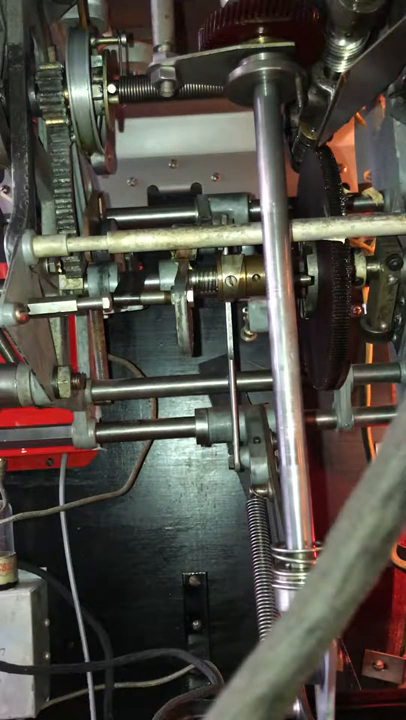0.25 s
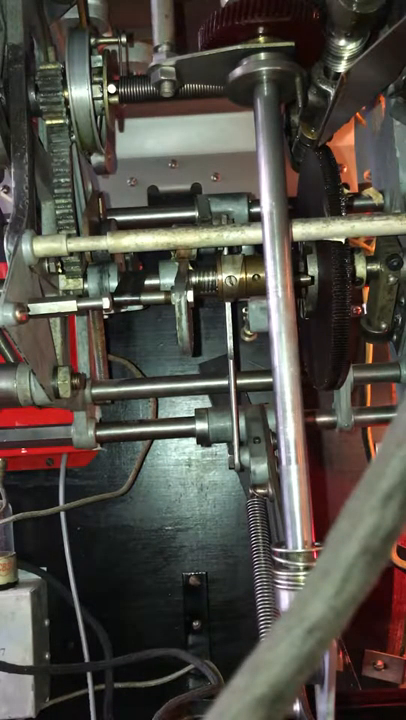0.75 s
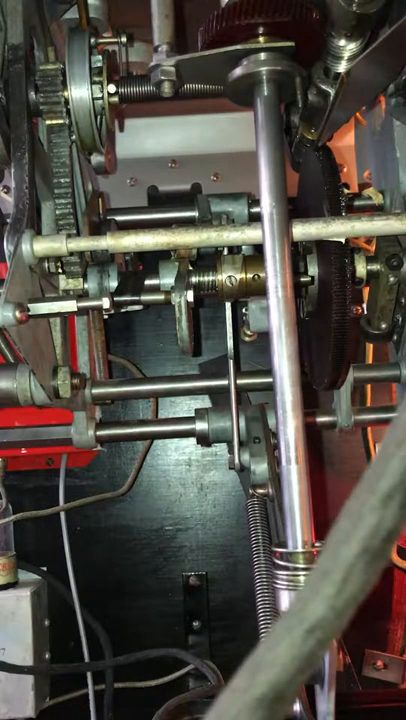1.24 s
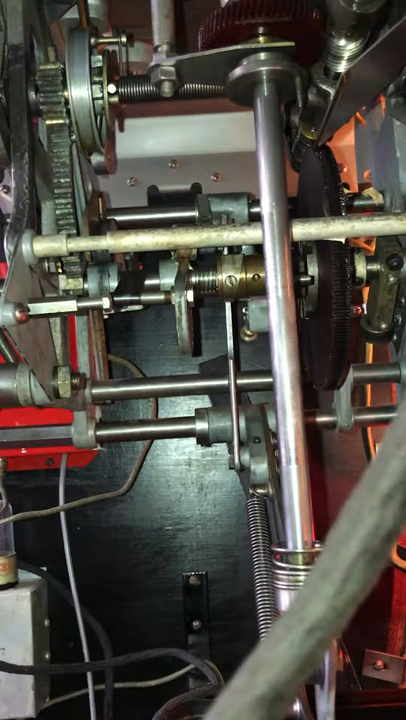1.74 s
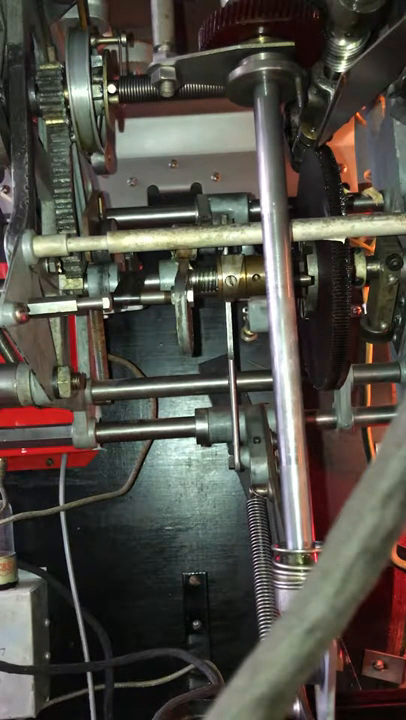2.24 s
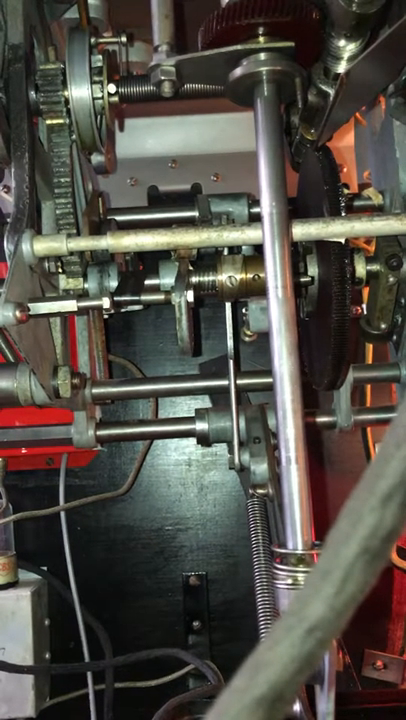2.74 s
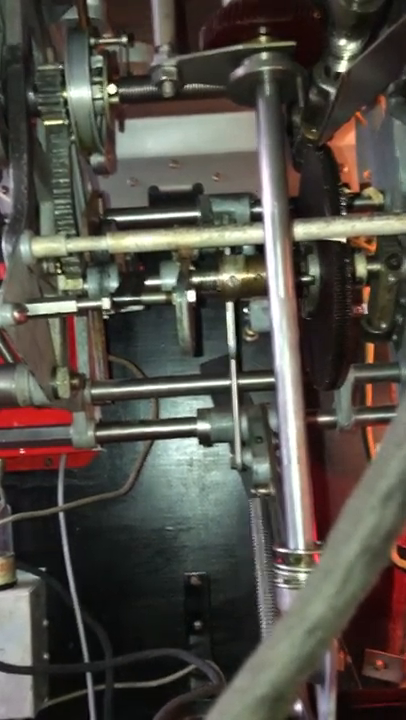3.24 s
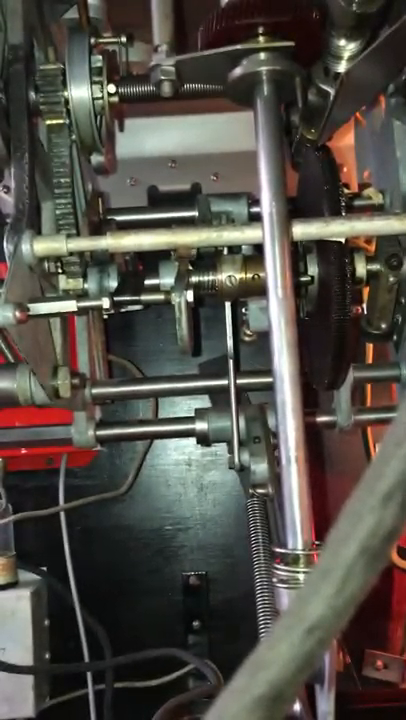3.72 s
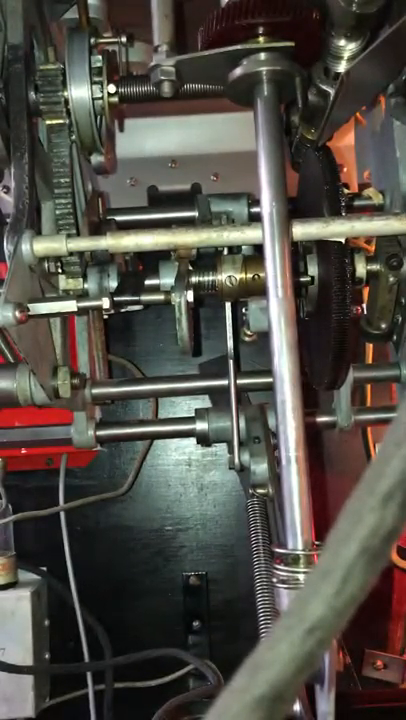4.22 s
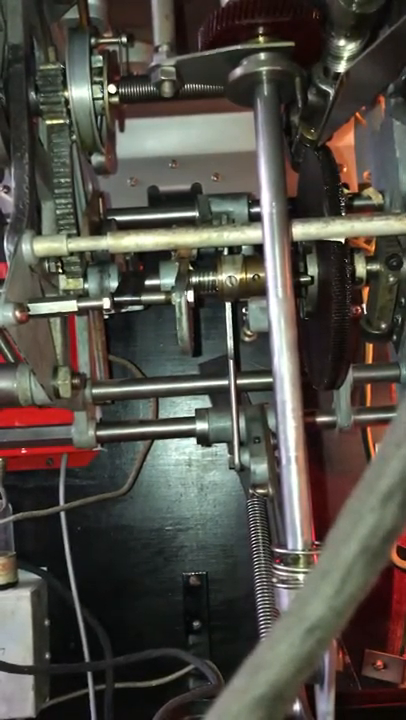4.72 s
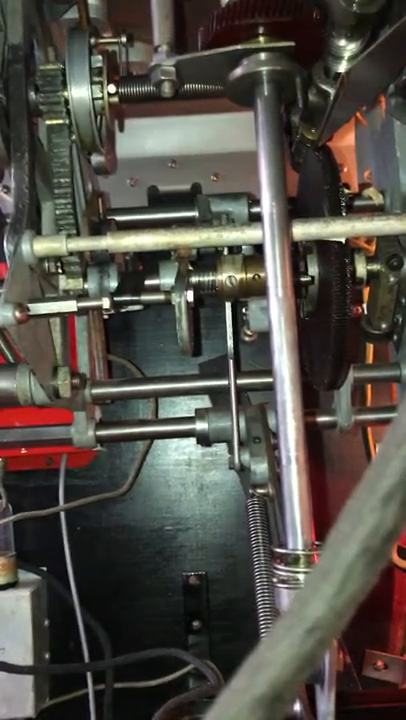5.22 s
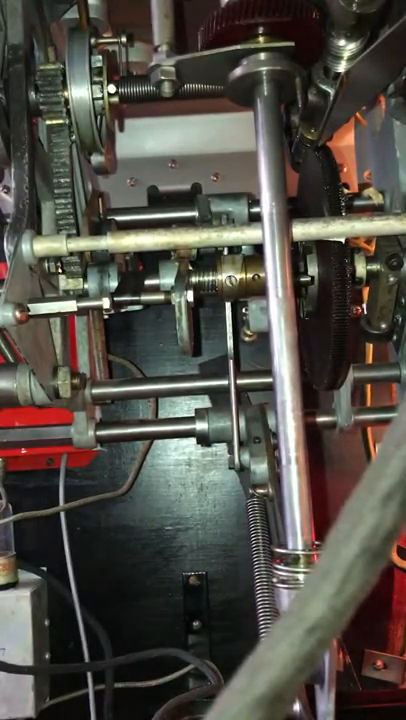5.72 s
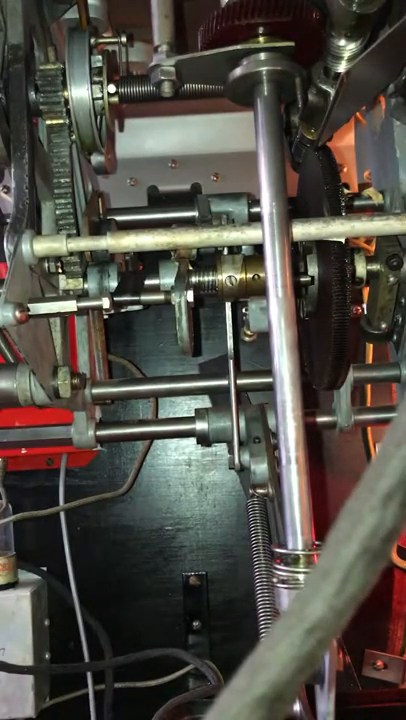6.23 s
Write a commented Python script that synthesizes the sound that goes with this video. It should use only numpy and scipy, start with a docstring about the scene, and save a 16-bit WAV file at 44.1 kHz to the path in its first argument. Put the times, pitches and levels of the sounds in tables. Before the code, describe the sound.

Close, dry indoor pickup of an open jukebox mechanism. A low 100 Hz hum, thin hiss and regular tiny electrical ticks run throughout. After a faint tap and light shaft rub, five quick heavy knocks clatter with steel levers, jingling springs and a buzzing plate. A pause follows, then five duller, boomy thumps with little clatter, settling back to hum.

```python
"""Mains hum over a faint hiss, then heavy knocks: the open works of a jukebox, miked close up in a room.
Two runs of five knocks land at two spots, the first run hard, the second dull.
Each knock rocks the cabinet, swings its panel, rings its modes and throws loose levers, which drop back.
Springs jingle with the shaking, a plate buzzes through the later knocks of the first run,
small parts tap now and then, and regular electrical ticks run through the hiss."""
import sys
import numpy as np
from scipy import signal
from scipy.fft import rfft, irfft, next_fast_len
from scipy.io import wavfile
from scipy.ndimage import uniform_filter1d

SR = 44100
rng = np.random.default_rng(int(sys.argv[2]) if len(sys.argv) > 2 else 0)


def generate_wav(signal):
    """Clip the signal to [-1, 1] and save it as 16-bit WAV at the path in sys.argv[1]."""
    frames = np.transpose(np.atleast_2d(signal))
    scaled = np.clip(frames, -1, 1) * 32767
    pcm = np.round(scaled).astype(np.int16)
    wavfile.write(sys.argv[1], SR, pcm)


N = 285184  # samples

# one run of knocks a spot, one row a knock: start_s, force_db, contact_corner_hz,
# closing_s (how long the contact takes to close), click_db, lever_drop_db
KNOCK_RUNS = [
    [(2.768, -8.5, 252, 0.0062, -53, -54), (2.948, -9, 504, .0003, -35, -58),
     (3.121, -3, 770, 0.00018, -39, -60), (3.3075, 0, 756, 0.00033, -39.5, -61),
     (3.488, -6, 754, 0.000057, -43, -70)],
    [(4.369, -6.5, 645, 0.0026, -52.5, -59), (4.538, -7.5, 613, 0.0035, -54.5, -64.5),
     (4.699, -3, 713, .003, -55, -57.5), (4.8745, -2.5, 785, 0.0019, -52.5, -60.5),
     (5.0445, 0.5, 1000, 0.0024, -54.5, -49)],
]
# how each spot answers a knock of 0 dB force: swing_hz, swing_length_s, swing_db,
# overtone_db (first knock of the run, whatever its force), rocking_db, ring_db, clatter_db, drop_centre_hz
KNOCKED_SPOTS = [(111.7, 0.021, -1, -12, -14.5, -1.72, -27, 970),
                 (110.1, 0.036, -9, -33, -18.5, 0, -45.5, 630)]
# dB gained for each dB of force: harder knocks clatter more, and ring and rock relatively less
RING_SLOPE, CLATTER_SLOPE = 0.59, 1.26


def amp(db):
    """Turns dB into a linear factor."""
    return 10 ** (np.asarray(db) / 20)


def evened(x):
    """Scales to rms 1."""
    return x / np.sqrt(np.mean(x ** 2) + 1e-20)


def read(points, hz):
    """Joins (Hz, value) points on a log-frequency axis."""
    f, value = np.transpose(points)
    return np.interp(np.log(hz + 1), np.log(f + 1), value)


def add(mix, s, sound):
    """Mixes a sound in at s seconds."""
    part = mix[round(s * SR):][:len(sound)]
    part += sound[:len(part)]


def noise(gain, size):
    """Noise of rms 1 with the spectrum gain(Hz)."""
    n = next_fast_len(size, True)
    spectrum = rfft(rng.standard_normal(n)) * gain(np.fft.rfftfreq(n, 1 / SR))
    return evened(irfft(spectrum, n)[:size])


def coloured(points, size):
    """Noise of rms 1 whose colour is given as (Hz, relative dB per Hz) points."""
    return noise(lambda f: amp(read(points, f)), size)


def band(hz, octaves):
    """A bell-shaped spectrum around hz."""
    return lambda f: np.exp(-.5 * (np.log2((f + 1) / hz) / octaves) ** 2)


def drift(rate_hz):
    """Slow random wandering of rms 1."""
    return noise(lambda f: np.exp(-(f / rate_hz) ** 2) * (f > 0), N)


def fall(t, t60):
    """A steady fall, 60 dB in t60 seconds."""
    return np.exp(-np.log(1000) * t / t60)


def dying(t, t60, rise):
    """A quick rise, then a steady fall in dB."""
    return (1 - np.exp(-t / rise)) * fall(t, t60)


def grainy(t, depth_db, size=60):
    """Metal meets metal in many tiny bounces: a random level, smoothed over size samples."""
    bounces = evened(uniform_filter1d(rng.standard_normal(len(t)), size))
    return evened(amp(depth_db * bounces))


def rattle(db, hz, octaves, t60):
    """A short burst of chatter in the range of one part."""
    t = np.arange(SR // 2) / SR
    grain = grainy(t, depth_db=0.84 * min(octaves, 1))
    return amp(db) * noise(band(hz, octaves), len(t)) * grain * dying(t, t60, rise=0.0022)


def room_noise(db=-61.0):
    """Low noise of the room, its treble rolled off further above 2600 Hz."""
    # colour of the room: frequency_hz, relative level_db per Hz
    room_colour = [(20, -37), (38, -7), (55, 3), (75, 1.5), (130, -3.5), (175, -9.5), (240, 3.5), (290, 1),
                   (340, -12), (450, -14.5), (800, -15), (1150, -18.5), (1450, -21), (2200, -23)]
    return amp(db) * noise(lambda f: amp(read(room_colour, f)) / (1 + (f / 2600) ** 4), N)


def amplifier_hiss(db=-73.5):
    """Thin, steady amplifier noise."""
    # colour of the hiss: frequency_hz, relative level_db per Hz
    hiss_colour = [(1500, -27), (2300, -3.5), (3900, -4), (4400, -3.5), (4850, -10), (5500, -0.5),
                   (6400, -1), (7600, -6), (8600, -3.5), (10400, -7.5), (10900, -5), (16000, -3.5)]
    return amp(db) * coloured(hiss_colour, N)


def shaft_rub(db=-82.5, swell_db=5, swell_at_s=2.17, swell_half_s=0.44):
    """A shaft rubs lightly throughout, and harder for a moment before the first run."""
    swell = np.exp(-((np.arange(N) / SR - swell_at_s) / swell_half_s) ** 4)
    return amp(db + swell_db * swell + 0.71 * drift(15)) * noise(band(3860, 0.31), N)


def hum(mains_hz=50, waver_db=0.5):
    """Transformer and motor hum at multiples of the mains, each wavering a little."""
    # hum lines: multiple of the mains, rms level_db
    hum_lines = [(2, -51), (3, -73.5), (4, -67), (6, -62), (7, -78), (8, -80.5), (10, -79), (14, -66.5),
                 (16, -80.5), (18, -82), (20, -77.5), (24, -82), (38, -90)]
    t, out = np.arange(N) / SR, np.zeros(N)
    for multiple, db in hum_lines:
        level = np.sqrt(2) * amp(db + waver_db * drift(5.6))
        out += level * np.sin(2 * np.pi * (multiple * mains_hz * t + rng.random()))
    return out


def interference(first_s=.091, gap_s=.1024, db=-52.0, spread_db=3.5):
    """Regular radio bursts leak into the microphone circuit as tiny, bright ticks."""
    out = np.zeros(N)
    at = np.round(np.arange(first_s, N / SR - .01, gap_s) * SR).astype(int)
    out[at] = amp(db + spread_db * rng.standard_normal(len(at)))
    return signal.lfilter([1, -1], [1], out)  # each tick goes up, then down


def small_parts():
    """Single loose parts tap and one squeaks in the works, as short bursts of banded noise."""
    # taps and the squeak: start_s, level_db, centre_hz, width_octaves, t60_s
    taps = [(1.605, -55, 1140, .3, .075), (1.62, -63, 860, .16, 0.21), (2.189, -60, 1200, .47, .06),
            (2.505, -65, 1600, 0.57, .063), (3.607, -65, 1600, .8, 0.084), (4.537, -43, 1120, 0.35, 0.054),
            (4.698, -47, 1030, 0.13, 0.099), (4.888, -61, 6300, .045, .09), (4.889, -60, 3050, 0.06, 0.075),
            (5.058, -54.5, 3000, .11, 0.058), (5.081, -47, 936, 0.39, 0.2), (5.303, -62, 1130, 0.13, .08),
            (5.715, -67, 950, 0.43, .1), (6.255, -65.5, 1665, 0.023, 0.2)]
    out = np.zeros(N)
    for s, db, hz, octaves, t60 in taps:
        add(out, s, rattle(db, hz, octaves, t60))
    return out


def buzz(shake, between=1.0, uneven_db=1.5):
    """A loose plate works itself into a buzz, louder on every forward swing of the cabinet, then settles."""
    # colour of the buzzing plate: frequency_hz, relative level_db per Hz
    buzz_colour = [(500, -3.5), (900, -5.5), (1150, 1.5), (1450, -16), (2100, -11), (2900, -23),
                   (3600, -16), (4800, -31), (9000, -39)]
    start_s, rise_s, end_s, release_t60_s = 3.13, 0.18, 3.645, 0.3
    between_db = -57  # level between forward swings
    t = np.arange(N) / SR
    slow = uniform_filter1d(shake, SR // 300)
    contact = uniform_filter1d((slow > 0) * 1., SR // 1000)
    attack = np.clip((t - start_s) / rise_s, 0, 1)
    release = fall(np.maximum(t - end_s, 0), release_t60_s)
    level = attack * release * amp(between_db + uneven_db * drift(35))
    return level * (between + contact) * coloured(buzz_colour, N)


def springs(shake, db=-76.0, hold_s=0.02, full_db=-39):
    """Springs jingle as long as the frame shakes, up to the limit of their play."""
    # resonances of the coil springs: frequency_hz, width_hz, level_db
    spring_modes = [(3650, 220, -3), (4420, 80, 2.5), (5570, 120, 1), (6230, 140, -4), (7070, 120, 2),
                    (8590, 120, -5), (10800, 600, -5.5), (14100, 130, -5), (15200, 130, -6)]

    def resonances(f):
        return sum(amp(level) / (1 + (2 * (f - hz) / width) ** 2) for hz, width, level in spring_modes)

    r = np.exp(-1 / (hold_s * SR))
    shaking = signal.lfilter([1 - r], [1, -r], abs(shake))
    drive = np.tanh(shaking / amp(full_db))
    return amp(db) * drive * noise(resonances, N) * amp(2 * drift(60))


def levers(t):
    """All lever modes struck at once, at a slightly different place each time; greased joints damp them."""
    # modes of the steel levers and shafts: frequency_hz, level_db
    lever_modes = [(823, -3.5), (899, -3), (945, -8), (1071, 4), (1115, -2.5), (1200, -7.5), (1261, -21),
                   (1303, 2), (1412, -12.5), (1458, -1.5), (1626, -6), (1814, 2.5), (2017, -26),
                   (2191, -20), (2390, -7), (2482, -3.5), (2923, -15), (3418, -24), (3591, -17)]
    hz, db = np.transpose(lever_modes)[:, :, None]
    place = rng.standard_normal(hz.shape)
    sign = (-1) ** np.arange(len(hz))[:, None]
    modes = sign * amp(db + 2 * place) * np.sin(2 * np.pi * hz * t)
    return modes.sum(0) * dying(t, t60=.13, rise=0.0012)


def shaken_levers(chatter, db=-7):
    """The chatter of loose parts keeps the levers ringing, at a level relative to that chatter."""
    rung = signal.oaconvolve(chatter, levers(np.arange(SR // 2) / SR))[:N]
    return amp(db) * np.std(chatter) * evened(rung)


def thrown_levers(throw_delay_s=.013, drop_delay_s=.074, throw_db=-9):
    """Each knock throws the loose levers against their upper stops; then they drop back onto their rests."""
    out = np.zeros(N)
    for run, (*_, clatter_db, drop_hz) in zip(KNOCK_RUNS, KNOCKED_SPOTS):
        for s, force_db, *_, drop_db in run:
            # the throw is set relative to the clatter of its knock
            level_db = clatter_db + CLATTER_SLOPE * force_db + throw_db
            add(out, s + throw_delay_s, rattle(level_db, hz=1720, octaves=0.88, t60=.13))
            add(out, s + drop_delay_s, rattle(drop_db, drop_hz, octaves=1.17, t60=0.098))
    return out


def clatter(t):
    """Many close modes of the frame and the room, as noise whose bands die at their own rates."""
    # dense upper modes of the frame: frequency_hz, relative level_db per Hz
    clatter_colour = [(150, -38), (380, 6.5), (650, 10), (850, 4.5), (1150, 1.5), (1500, -7), (2200, -12.5),
                      (3500, -18.5), (5000, -24), (8000, -31), (16000, -63)]
    # how long they ring: frequency_hz, t60_s
    clatter_decay = [(300, 0.28), (1100, 0.21), (2500, 0.33), (6000, 0.34), (15000, .12)]
    hz, s, z = signal.stft(coloured(clatter_colour, len(t)), SR, nperseg=256)
    z = z * fall(s, read(clatter_decay, hz)[:, None])
    return signal.istft(z, SR, nperseg=256)[1][:len(t)] * (1 - np.exp(-t / 0.0011))


def click(t, force_db, closing_s):
    """Steel on steel: grainy bright noise, longer when the knock is heavy or the contact closes slowly."""
    # colour of the click: frequency_hz, relative level_db per Hz
    click_colour = [(400, -20), (1200, 11), (2500, 0.5), (4300, -2.5), (5000, -7), (6200, -4), (8000, -9.5),
                    (11000, -10.5), (14500, -10), (17000, -18)]
    t60 = 0.15 * amp(0.86 * force_db) + 11.3 * closing_s
    return coloured(click_colour, len(t)) * grainy(t, depth_db=2.5) * dying(t, t60, rise=.0011)


def ring(t, spot, corner_hz, build_cycles):
    """Cabinet modes of alternating sign, each building up over some cycles; a high corner excites higher ones."""
    # modes of cabinet and frame: frequency_hz, t60_s, level_db struck at spot 0, level_db struck at spot 1
    cabinet_modes = [(45.1, 1.75, -33, -36.5), (51.7, 0.86, -20, -30), (63, 0.43, -29, -20),
                     (87.13, 0.82, -20.5, -24.5), (102.9, 0.82, -21, -43), (112.4, 0.88, -37, -30.5),
                     (128.7, 1.56, -38.5, -44), (146.5, 0.45, -26, -28), (168, 0.56, -35.5, -30.5),
                     (196.5, 0.22, -24, -29), (216.5, 0.63, -31, -43.5), (223.4, 0.12, -12, -26.5),
                     (254.2, 0.37, -23.5, -37.5), (278.2, 0.288, -19, -30), (317.8, 0.31, -30.5, -42.5),
                     (331.6, 0.48, -32, -48), (356.3, 0.25, -26, -38.5), (398.8, 0.63, -43.5, -49.5),
                     (450, 0.31, -35.5, -51), (515, 0.085, -25, -53), (539, 0.26, -34.5, -57.5),
                     (623, 0.053, -18, -55), (664.5, 0.22, -28, -42), (729, 0.055, -19.5, -48),
                     (823, 0.36, -38.5, -51), (872, 0.085, -25.5, -62), (995, 0.5, -41.5, -52.5),
                     (1129, 0.32, -32, -50)]
    out = np.zeros(len(t))
    for k, (hz, t60, *db) in enumerate(cabinet_modes):
        level = (-1) ** k * amp(db[spot]) / np.hypot(1, (hz / corner_hz) ** 2)
        build = (1 - np.exp(-t * hz / build_cycles)) ** 2
        out += level * np.sin(2 * np.pi * hz * t) * fall(t, t60) * build
    return out


def swing(t, hz, length):
    """The panel swings for a few cycles while it is pushed, then is stopped."""
    u = t / length
    return -u * np.exp(-u ** 3) * np.sin(2 * np.pi * hz * t)


def knocks(fresh=0.48, lever_db=-14, overtone_ratio=1.756, overtone_fall_db=5):
    """Force sets swing, rocking, ring and clatter; knocks on one spot share part of their clatter."""
    out, t = np.zeros(N), np.arange(SR) / SR
    early = t[:SR // 2]
    for spot, run in enumerate(KNOCK_RUNS):
        hz, length, swing_db, overtone_db, rock_db, ring_db, clatter_db, _ = KNOCKED_SPOTS[spot]
        frame = clatter(early)
        for k, (s, force_db, corner_hz, closing_s, click_db, _) in enumerate(run):
            add(out, s, amp(swing_db + force_db) * swing(early, hz, length))
            # an off-centre knock also bends the panel in its second shape;
            # the parts settle during a run, so each knock bends it less than the one before
            bend = swing(early, hz * overtone_ratio, length)
            add(out, s, amp(overtone_db - k * overtone_fall_db) * bend)
            # the whole cabinet rocks on its feet, against the panel
            rock = swing(early, hz=58, length=0.032)
            add(out, s, -amp(rock_db + RING_SLOPE * force_db) * rock)
            # a mode at the corner builds up over 2.2 closing times
            modes = ring(t, spot, corner_hz, build_cycles=2.2 * corner_hz * closing_s)
            add(out, s, amp(ring_db + RING_SLOPE * force_db) * modes)
            upper = (frame + fresh * clatter(early)) / np.hypot(1, fresh)
            upper = upper + amp(lever_db) * levers(early)
            bright = amp(clatter_db + CLATTER_SLOPE * force_db) * upper
            bright = bright + amp(click_db) * click(early, force_db, closing_s)
            closing = 1 - np.exp(-early / closing_s)
            add(out, s, closing * bright)
    return out


def scene():
    """The knocks drive the loose parts; hum, hiss and ticks run underneath."""
    background = room_noise() + amplifier_hiss() + shaft_rub() + hum() + interference()
    blows, chatter = knocks(), thrown_levers()
    loose = small_parts() + buzz(blows) + springs(blows) + shaken_levers(chatter) + chatter
    return (background + loose + blows)[None]


def record(dry):
    """The microphone sheds the deepest bass; then the treble is cut off at the band limit."""
    thinned = signal.sosfilt(signal.butter(2, 27, "highpass", fs=SR, output="sos"), dry)
    # a steeper cut below 31 Hz
    thinned = irfft(rfft(thinned) / (1 + (31 / (np.fft.rfftfreq(N, 1 / SR) + 1)) ** 10), N)
    band_limit = signal.firwin(511, 17250, window=("kaiser", 9), fs=SR)
    return signal.oaconvolve(thinned, band_limit[None], "same")


dry = scene()
out = record(dry)
generate_wav(out)
```